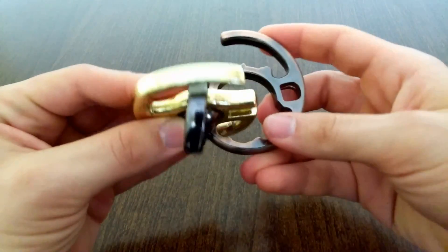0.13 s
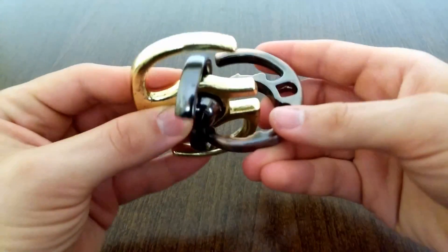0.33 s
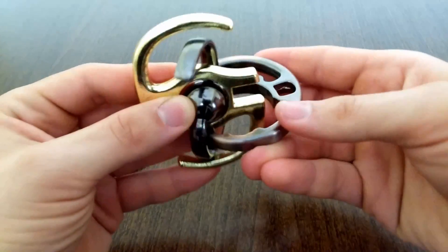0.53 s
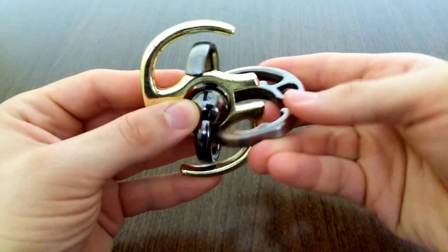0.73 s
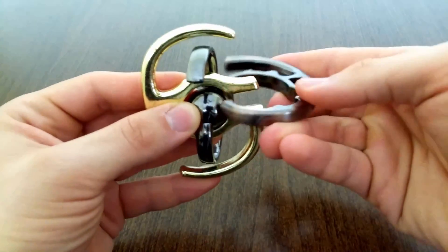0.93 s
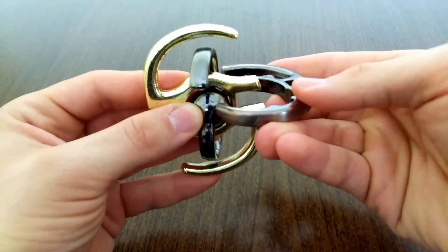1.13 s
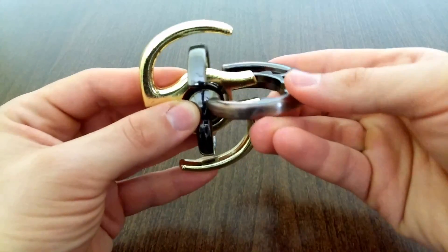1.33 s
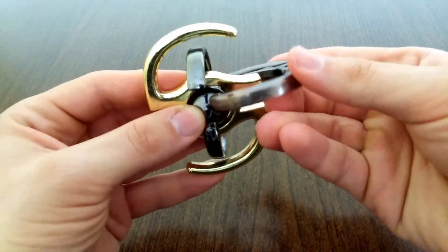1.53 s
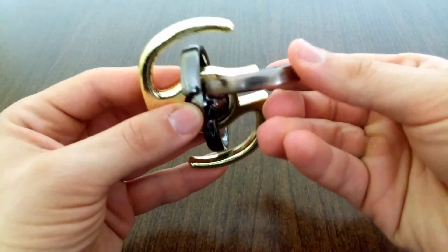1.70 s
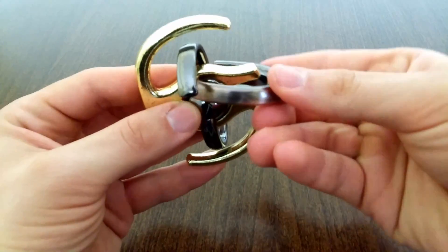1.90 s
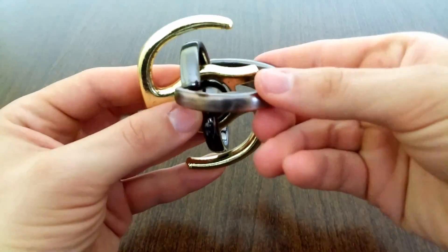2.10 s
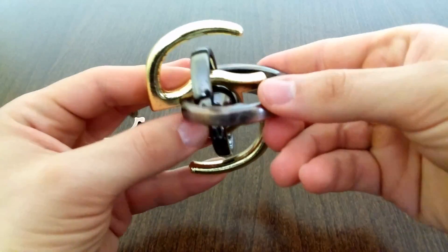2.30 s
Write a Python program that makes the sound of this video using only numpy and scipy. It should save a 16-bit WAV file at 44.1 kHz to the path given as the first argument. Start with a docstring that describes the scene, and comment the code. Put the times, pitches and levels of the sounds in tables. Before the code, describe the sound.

Metal puzzle pieces clink close up, left of centre, in a small quiet room. Faint taps lead to a bright, hard clink at 0.2 s with a short rasp, then a dry knock at 0.3 and a faint click near 0.45. After a lull, light taps at 0.9 precede a ringing double clink at 1.1. Sparser clicks follow at 1.3, 1.8, 1.95-2.3, over a faint low table rub and soft hiss.

```python
"""In a small quiet room, the cast metal pieces of a hand puzzle clink, scrape and knock above a wooden table.
Each clink is a noisy tick, a choked ring and freely decaying modes mixed differently at each contact.
Grazing taps add short pings, pinched pieces knock drily, and sliding pieces rasp with tiny slips.
Later a forearm rubs dully on the table, as slips through low resonances, over soft rumble and hiss.
The puzzle is close to the left microphone."""
import sys
import numpy as np
from scipy import signal
from scipy.fft import rfft, irfft
from scipy.io import wavfile

SR = 44100
rng = np.random.default_rng(int(sys.argv[2]) if len(sys.argv) > 2 else 0)


def store_wav(level_fs):
    """Save 16-bit WAV to argv[1]."""
    pcm = np.round(np.clip(np.atleast_2d(level_fs), -1, 1) * 32767)
    wavfile.write(sys.argv[1], SR, pcm.T.astype(np.int16))


N = 103635  # length in samples


def amp(db):
    """Decibels to gain."""
    return 10 ** (np.asarray(db) / 20)


def unit(x):
    """Scales to rms 1."""
    return x / np.sqrt(np.mean(x ** 2) + 1e-20)


def read(points, hz):
    """Reads a table on a log-frequency axis."""
    f, value = np.transpose(points)
    return np.interp(np.log(hz + 1), np.log(f + 1), value)


def level(points):
    """Gain over time from time and dB points."""
    return amp(np.interp(np.arange(N) / SR, *np.transpose(points)))


def colour(x, points):
    """Filters by a spectrum, to rms 1."""
    gain = amp(read(points, np.fft.rfftfreq(x.shape[-1], 1 / SR)))
    return unit(irfft(rfft(x) * gain, x.shape[-1]))


def add(mix, start_s, sound, right_cut_db, room_db=0):
    """Places a sound in the left, right and room-feed tracks, with the right cut and the feed level in dB."""
    part = mix[:, max(round(start_s * SR), 0):][:, :len(sound)]
    part += amp([[0], [-right_cut_db], [room_db]]) * sound[:part.shape[1]]


def resonate(x, hz, width_hz):
    """A one-pole complex resonance with a peak gain near 1."""
    r = np.exp(-np.pi * width_hz / SR)
    pole = r * np.exp(2j * np.pi * hz / SR)
    return 2 * signal.lfilter([1 - r], [1, -pole], x).real


RING_ATTACK_S = 0.00055
# Random pitch offset and slow waver, both as a fraction of each mode's pitch
GRIP_DETUNE, GRIP_WAVER, GRIP_WAVER_HZ = 0.00081, .0012, 4.7


def ring(modes, t60_s):
    """Struck metal: decaying sines, detuned and slowly bent by the shifting grip."""
    t = np.arange(SR // 2) / SR
    hz, db = np.transpose(modes)[:, :, None]
    waver = GRIP_WAVER * np.sin(2 * np.pi * (GRIP_WAVER_HZ * t + rng.random(hz.shape)))
    detune = GRIP_DETUNE * rng.standard_normal(hz.shape)
    turns = np.cumsum(hz * (1 + detune + waver), axis=1) / SR + rng.random(hz.shape)
    tones = amp(db - 60 * t / t60_s) * np.sin(2 * np.pi * turns)
    return tones.sum(0) * (1 - np.exp(-t / RING_ATTACK_S))


# Spectrum of metal contact: pitch_hz, density_db (relative, per Hz)
CONTACT_SPECTRUM = [(150, -42.5), (600, -20), (1200, -24), (2400, -9.5), (3800, -8), (5200, 1.5),
                    (6800, -4), (8200, -0.5), (10000, 5.5), (11500, -7.5), (14500, -11), (16000, -29.5)]
TICK_ATTACK_S, TICK_T60_S = 0.0003, 0.018
# Pitch span of the clack modes: lowest_hz, highest_hz
CLACK_RANGE_HZ = (943.6, 14360)
CLACK_DB, CLACK_T60_S = -10, 0.043


def tick(count=48):
    """Metal meeting metal: a crack of noise and a clack of quickly damped modes, redrawn each time."""
    t = np.arange(SR // 2) / SR
    crack = colour(rng.standard_normal(len(t)), CONTACT_SPECTRUM)
    crack *= amp(-60 * t / TICK_T60_S) * (1 - np.exp(-t / TICK_ATTACK_S))
    # One random pitch in each equal slice of the span
    place = (np.arange(count) + rng.random(count)) / count
    hz = np.interp(place, [0, 1], CLACK_RANGE_HZ)
    clack = ring(np.transpose([hz, read(CONTACT_SPECTRUM, hz)]), CLACK_T60_S)
    return crack + amp(CLACK_DB) * clack


# Close modes of the main ring: offset_hz (from its pitch), level_db
MAIN_MODES = [(-125, -5), (0, 0), (70, -4), (205, -7)]


def cluster(hz):
    """The close modes of the main ring around a pitch."""
    return [(hz + offset_hz, db) for offset_hz, db in MAIN_MODES]


# Full contacts: start_s, tick_db, choked_ring_db, main_pitch_hz, main_ring_db, chime_db, bell_db,
# low_ring_db, top_ring_db, left_minus_right_db (of the rings)
CLINKS = [ (.2193, -21.5, -8.5, 9300, -22, -61, -70, -63, -33, 7),
          (.222, -28, -2, 9440, -17.5, -51.5, -50, -61, -25, 33),
          (.2285, -24, -13, 9410, -32.5, -51, -44, -60, -62, 6),
          (0.4438, -43, -33, 9420, -52.5, -41.5, -71, -64, -44.5, 30),
          (0.458, -36, -51.5, 9450, -62.5, -28, -77, -64, -75, 36.5),
          (.976, -47.5, -40, 9230, -44.5, -48.5, -50.5, -83, -96, 9),
          (1.1005, -24.5, -14, 9190, -67, -26.5, -52, -45, -54, 5),
          (1.106, -38, -40, 9190, -28.5, -21, -26, -33.5, -43, 14),
          (1.134, -18, -22, 9290, -29, -31, -29, -43.5, -30, 9),
          (1.145, -28, -7.5, 9232, -26.5, -29.5, -28, -40.5, -52, 19.5),
          (1.306, -29, -28.5, 9100, -54, -46.5, -49, -49.5, -59, 5.5),
          (1.8231, -38.5, -28, 9500, -50.5, -43.5, -54, -58.5, -71, 18),
          (1.952, -27.5, -16, 9272, -57, -52, -45, -38, -65, 15.5),
          (1.986, -34.5, -18.5, 9272, -48, -45, -69, -53, -83, -7),
          (2.133, -69, -25, 9272, -38, -38, -45.5, -48, -61, 9)]
# Mode sets of the free rings: pitch_hz, level_db
CHIME_MODES = [(4393, -4), (10540, -8), (11672, -1)]
BELL_MODES = [(2488, -16), (4932, -9), (5255, -13), (5572, 0), (8436, -10)]
LOW_MODES = [(1725, -15), (3760, -6), (4463, -1), (5954, -7), (7630, -6), (7900, -3)]
TOP_MODES = [(12690, 0), (13335, -8), (13738, -1), (14370, 0), (14540, 0)]
# Ring time of each set: main_s, chime_s, bell_s, low_s, top_s (to fall 60 dB)
RING_T60_S = [.21, .12, .21, .16, .14]
# Room feed of each set: main_db, chime_db, bell_db, low_db, top_db
RING_ROOM_DB = [-2, -17, -7, -7, -12]
CHOKED_T60_S, CHOKED_ROOM_DB = 0.028, -3.5
TICK_PAN_SHARE = 0.86  # ticks are panned a little less than rings


def clinks():
    """Each contact splits into a tick that fills the room, a choked ring and free rings beamed at the mic."""
    out = np.zeros((3, N))
    for start_s, tick_db, choked_db, main_hz, *rings_db, pan_db in CLINKS:
        add(out, start_s, amp(tick_db) * tick(), TICK_PAN_SHARE * pan_db)
        choked = ring(cluster(main_hz), CHOKED_T60_S)
        add(out, start_s, amp(choked_db) * choked, pan_db, CHOKED_ROOM_DB)
        mode_sets = (cluster(main_hz), CHIME_MODES, BELL_MODES, LOW_MODES, TOP_MODES)
        for db, modes, t60_s, room_db in zip(rings_db, mode_sets, RING_T60_S, RING_ROOM_DB):
            add(out, start_s, amp(db) * ring(modes, t60_s), pan_db, room_db)
    return out


# Single modes of a puzzle arm: start_s, pitch_hz, level_db
ARM_TONES = [(0.315, 1748, -44.5), (0.977, 2438, -53), (1.987, 3400, -31.5), (2.132, 1105, -56),
             (2.233, 1738, -55.5)]
ARM_T60_S = .12
SLIDE_PAN_DB = 14.5  # left minus right, for arm tones and slides


def arm_tones():
    """An arm of the puzzle rings out on one mode at a time."""
    out = np.zeros((3, N))
    for start_s, hz, db in ARM_TONES:
        add(out, start_s, amp(db) * ring([(hz, 0)], ARM_T60_S), SLIDE_PAN_DB, room_db=-7)
    return out


# Grazing contacts: start_s, tick_db, ping_db, main_ring_db
TAPS = [(.007, -51, -38.5, -51), (0.1002, -42, -36, -44), (.1831, -36, -37, -42), (.19, -29, -22, -56),
        (0.9244, -41.5, -31, -41.5), (.9625, -48, -69, -50.5), (1.989, -26.5, -20, -59),
        (2.1296, -35, -22.5, -71), (2.2715, -43, -41.5, -72)]
# Modes of the short ping: pitch_hz, level_db
PING_MODES = [(2600, -17), (4950, -7), (5200, -13), (9260, 0), (10050, -12), (12690, -15)]
PING_T60_S, TAP_MAIN_HZ, TAP_PAN_DB = 0.033, 9250, 15.5
TAP_DULL_HZ = 11700  # low-pass on the tick


def taps():
    """Glancing contacts: a soft tick, a short ping and a faint main ring."""
    out = np.zeros((3, N))
    soft = signal.butter(2, TAP_DULL_HZ, fs=SR, output="sos")
    for start_s, tick_db, ping_db, main_db in TAPS:
        soft_tick = amp(tick_db) * signal.sosfilt(soft, tick())
        main = amp(main_db) * ring(cluster(TAP_MAIN_HZ), RING_T60_S[0])
        add(out, start_s, soft_tick + main, TAP_PAN_DB)
        add(out, start_s, amp(ping_db) * ring(PING_MODES, PING_T60_S), TAP_PAN_DB, room_db=-6)
    return out


# Contacts of a tightly pinched piece: start_s, tick_db, ring_db, ring_t60_s, left_minus_right_db
KNOCKS = [(0.315, -30, -29.5, 0.011, 3.5), (2.2336, -49, -38.5, 0.043, 37), (2.281, -39.5, -32, 0.043, 10)]
# Modes of the pinched piece: pitch_hz, level_db
PINCHED_MODES = [(1250, -19), (3475, -11), (4931, -13), (5400, -11), (7530, 0), (8050, -4), (10888, -14),
                 (13800, -16)]


def knocks():
    """Duller, drier contacts of a piece damped by the fingers."""
    out = np.zeros((3, N))
    for start_s, tick_db, ring_db, t60_s, pan_db in KNOCKS:
        knock = amp(tick_db) * tick() + amp(ring_db) * ring(PINCHED_MODES, t60_s)
        add(out, start_s, knock, pan_db, room_db=-5.5)
    return out


SLIP_SPREAD_DB = -4.5  # multiplies an exponential draw capped at 2


def slips(per_s):
    """Random stick-slip impulses of either sign and uneven size."""
    hits = rng.random(N) < per_s / SR
    signs = rng.choice([-1., 1.], N)
    return hits * signs * amp(SLIP_SPREAD_DB * np.minimum(rng.exponential(1, N), 2))


# Pieces sliding on each other: start_s, length_s, level_db (at the start)
SLIDES = [(0.229, 0.14, -41.5), (1.144, 0.099, -43)]
SLIPS_PER_S, SLIDE_RING_HZ = 2700, 9390
SLIDE_RING_DB, SLIDE_FADE_DB = 6.5, -8.5  # ring against hiss; level change over the slide


def slides():
    """Dense runs of tiny slips hiss and keep the choked ring alive."""
    out = np.zeros((3, N))
    for start_s, length_s, db in SLIDES:
        grains = slips(SLIPS_PER_S)
        sustained = unit(resonate(grains, SLIDE_RING_HZ, 220))
        rasp = colour(grains, CONTACT_SPECTRUM) + amp(SLIDE_RING_DB) * sustained
        u = np.linspace(0, 1, max(round(length_s * SR), 2))
        add(out, start_s, rasp[:len(u)] * amp(db + SLIDE_FADE_DB * u), SLIDE_PAN_DB)
    return out


# Decay of the room tail: pitch_hz, t60_s
ROOM_DECAY = [(200, 1), (1000, 0.21), (2500, 0.48), (5500, 0.4), (9500, 0.37), (15000, 0.45)]
ROOM_DB, EARLY_DB, RIGHT_ROOM_DB = -8.5, -8.5, -1.5
EARLY_T60_S, ROOM_DELAY_S = 0.035, 0.0087


def room(x):
    """Quick reflections from table and hands, with the room tail, as stereo decaying noise echoes."""
    t = np.arange(SR) / SR
    early, late = rng.standard_normal((2, 2, SR)) * (t > ROOM_DELAY_S)
    early = early * amp(-60 * t / EARLY_T60_S)
    # Each frequency band of the tail dies at its own rate
    hz, at_s, z = signal.stft(late, SR, nperseg=256)
    decay = amp(-60 * at_s / read(ROOM_DECAY, hz)[:, None])
    late = signal.istft(z * decay, SR, nperseg=256)[1][:, :SR]
    echo = (amp(ROOM_DB) * unit(late) + amp(EARLY_DB) * unit(early)) / np.sqrt(SR)
    return signal.fftconvolve(x[None], echo, axes=1)[:, :N] * amp([[0], [RIGHT_ROOM_DB]])


# Loudness curve of the forearm rub: time_s, level_db
RUB_LEVEL = [(1.36, -92), (1.44, -69.5), (1.54, -76), (1.64, -62.5), (1.70, -65), (1.78, -81),
             (1.92, -83.5), (2.05, -61), (2.17, -61.5), (2.22, -70), (2.35, -60)]
# Table resonances: pitch_hz, width_hz, level_db
TABLE_MODES = [(185, 47, 2.5), (234, 29, 4), (366, 66, -6.5)]
RUB_SLIPS_PER_S, RUB_PAN_DB = 700, 4


def rub():
    """Skin slipping on wood drives the low resonances of the table."""
    grains = slips(RUB_SLIPS_PER_S)
    body = np.zeros(N)
    for hz, width_hz, db in TABLE_MODES:
        # Two passes steepen the sides of each resonance
        body += amp(db) * resonate(resonate(grains, hz, width_hz), hz, width_hz)
    return unit(body) * level(RUB_LEVEL) * amp([[RUB_PAN_DB / 2], [-RUB_PAN_DB / 2]])


# Loudness curve of the low rumble: time_s, level_db
RUMBLE_LEVEL = [(0, -89), (.25, -69), (.41, -64), (.6, -77), (1.2, -71.5), (1.5, -71.5), (1.85, -84),
                (2.0, -69.5)]
# Rumble spectrum: pitch_hz, density_db (relative, per Hz)
RUMBLE_COLOUR = [(20, -9), (60, -4.5), (180, -6.5), (400, -15.5), (5000, -29.5)]
# Hiss spectrum: pitch_hz, density_db (relative, per Hz)
HISS_COLOUR = [(200, -2), (2000, -11), (9000, -6), (16000, -9.5)]
HISS_DB, FLOOR_PAN_DB = -79, 2
FLOOR_LIKENESS = 0.3  # correlation of left and right noise


def floor():
    """Coloured noise: a low rumble that swells and sinks, and faint steady hiss."""
    a, b = rng.standard_normal((2, 2, N))
    right = FLOOR_LIKENESS * a + np.sqrt(1 - FLOOR_LIKENESS ** 2) * b
    low, high = np.stack([a, right], axis=1)
    rumble = colour(low, RUMBLE_COLOUR) * level(RUMBLE_LEVEL)
    hiss = amp(HISS_DB) * colour(high, HISS_COLOUR)
    return (rumble + hiss) * amp([[FLOOR_PAN_DB / 2], [-FLOOR_PAN_DB / 2]])


METAL_LOW_CUT_HZ, RIGHT_LAG_S = 820, 0.00013


def scene():
    """The puzzle, with its bass thinned and farther from the right mic, with room, table and background."""
    metal = clinks() + arm_tones() + taps() + knocks() + slides()
    metal = signal.sosfilt(signal.butter(2, METAL_LOW_CUT_HZ, "high", fs=SR, output="sos"), metal)
    # A phase slope gives a delay of a fraction of a sample
    lag = np.exp(-2j * np.pi * np.fft.rfftfreq(N, 1 / SR) * RIGHT_LAG_S)
    right = irfft(rfft(metal[1]) * lag, N)
    return np.array([metal[0], right]) + room(metal[2]) + rub() + floor()


EDGE_HZ = 15600


def record(dry):
    """A steep low-pass: the sound has almost nothing above about 15.6 kHz."""
    low_pass = signal.firwin(127, EDGE_HZ, window=("kaiser", 9), fs=SR)
    return signal.oaconvolve(dry, low_pass[None], "same")


dry = scene()
out = record(dry)
store_wav(out)
```